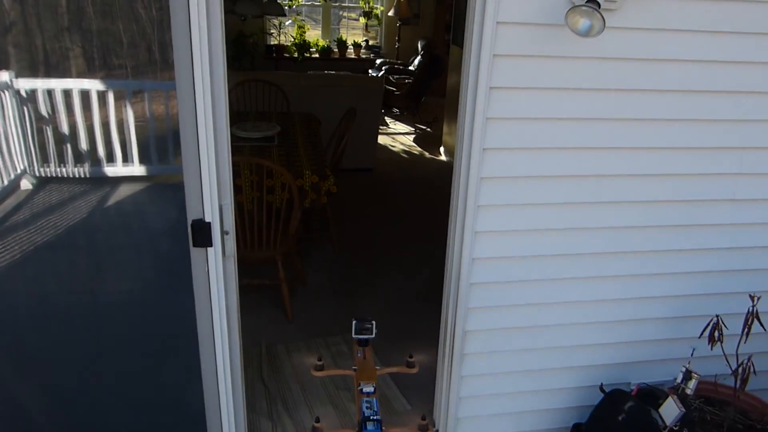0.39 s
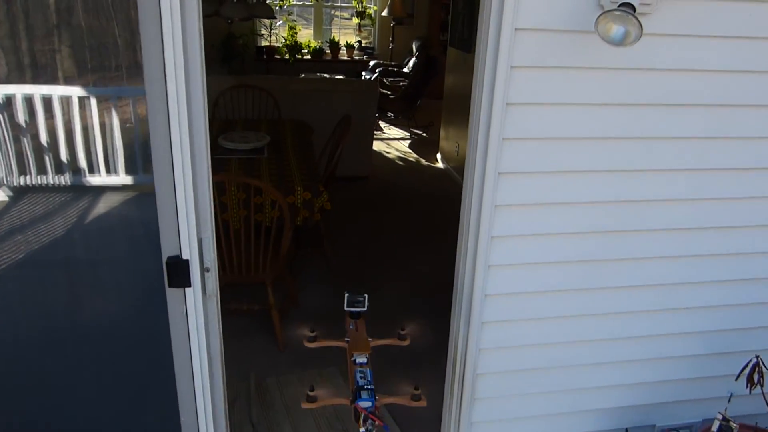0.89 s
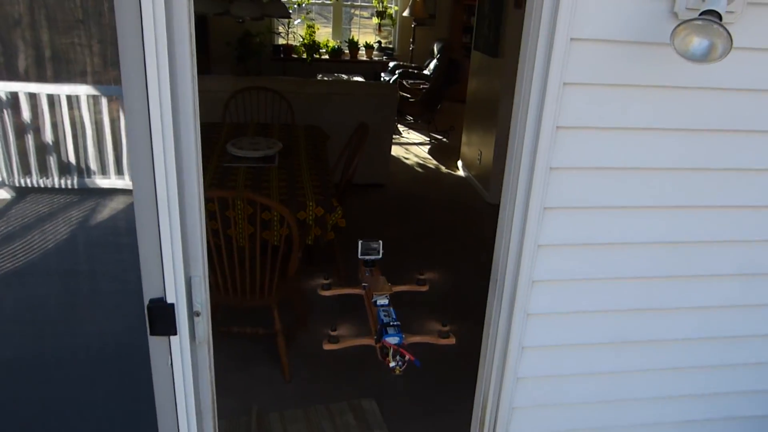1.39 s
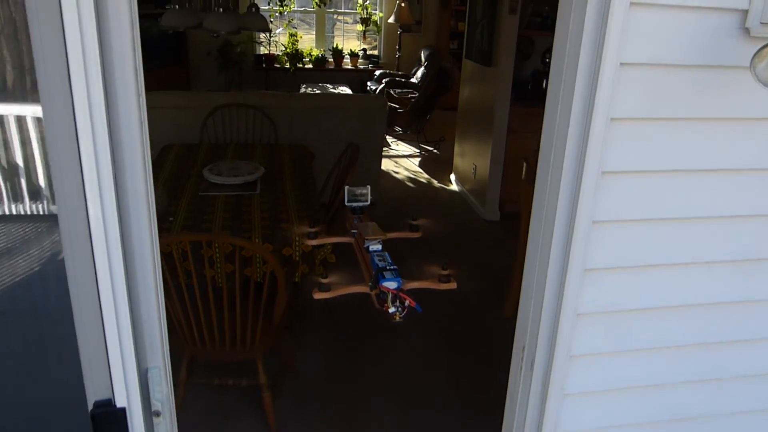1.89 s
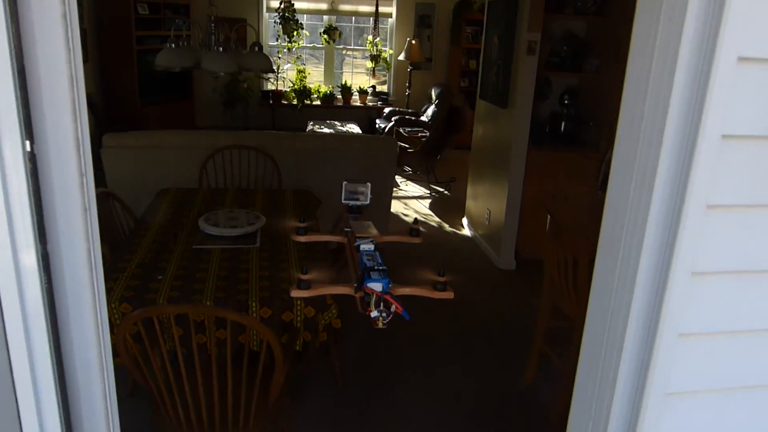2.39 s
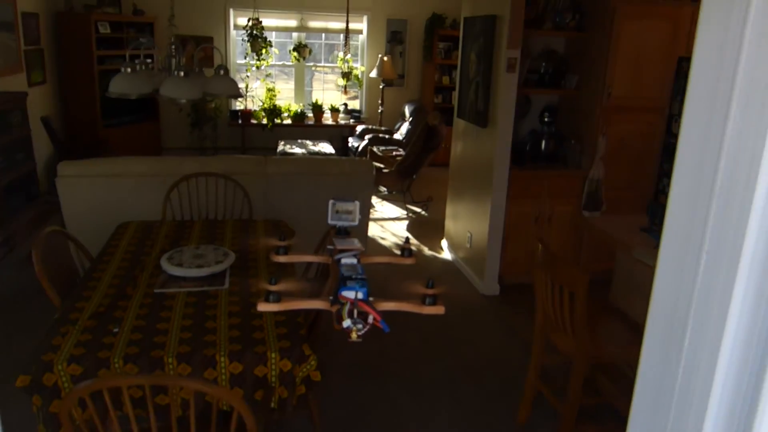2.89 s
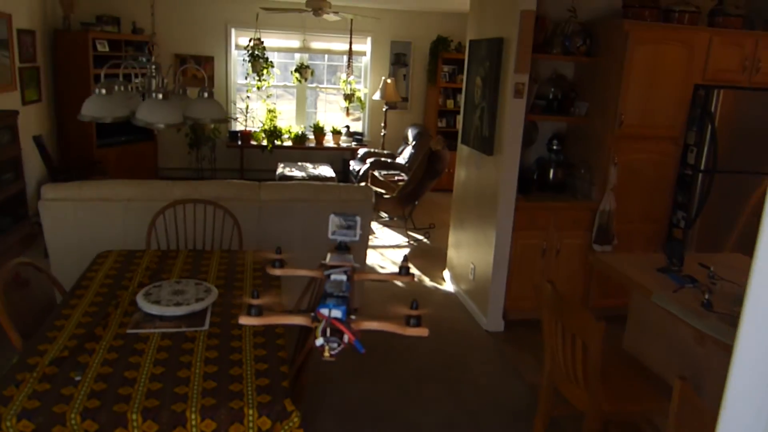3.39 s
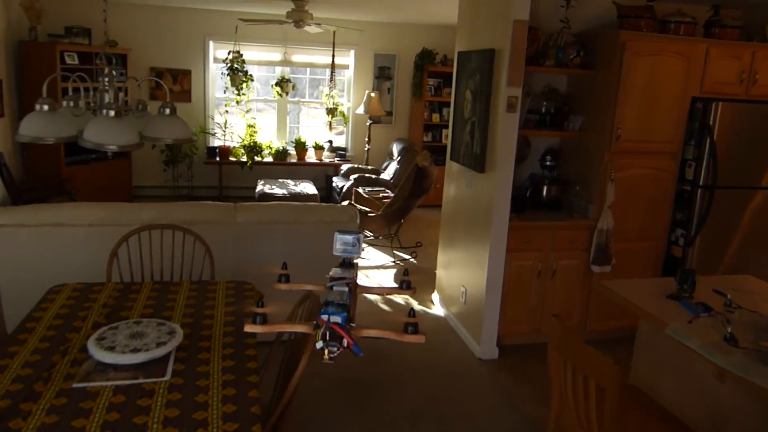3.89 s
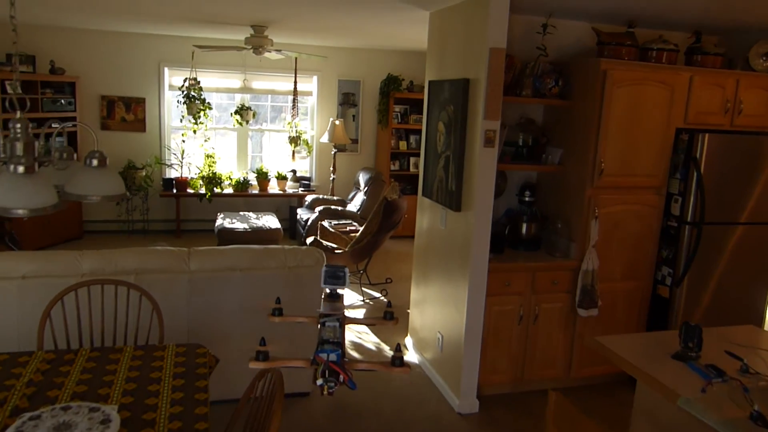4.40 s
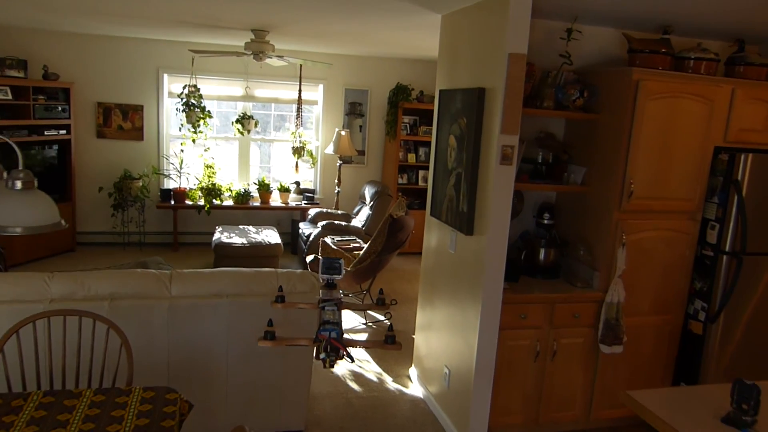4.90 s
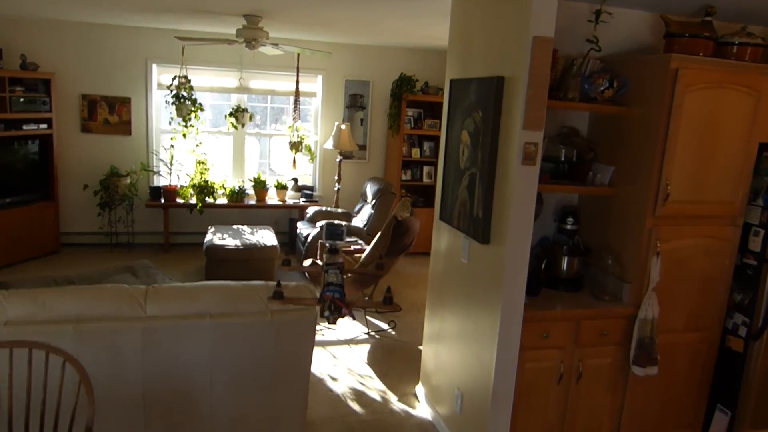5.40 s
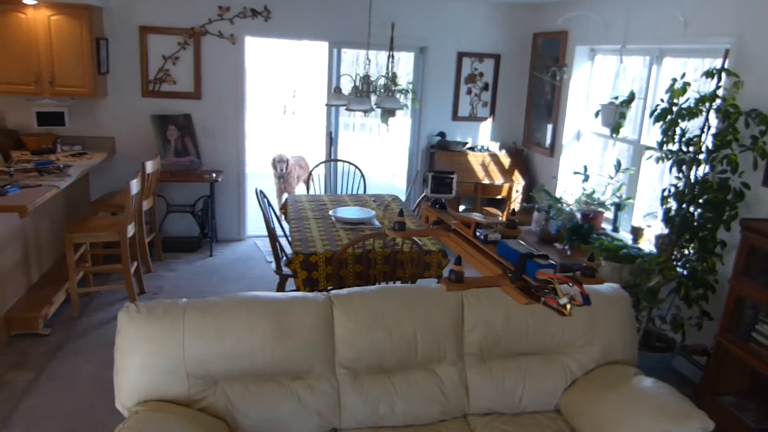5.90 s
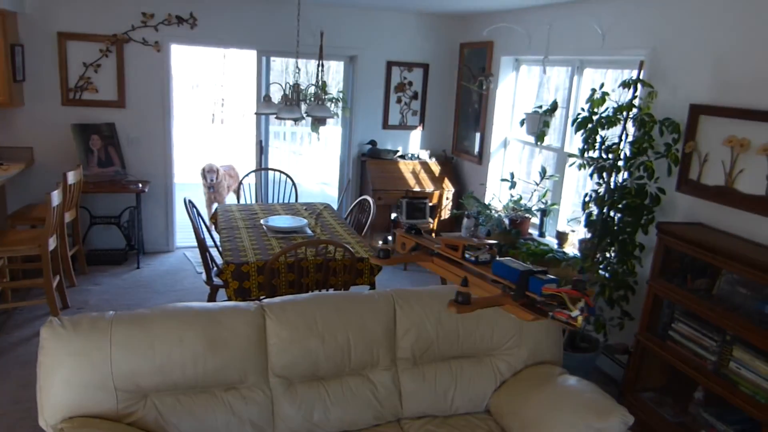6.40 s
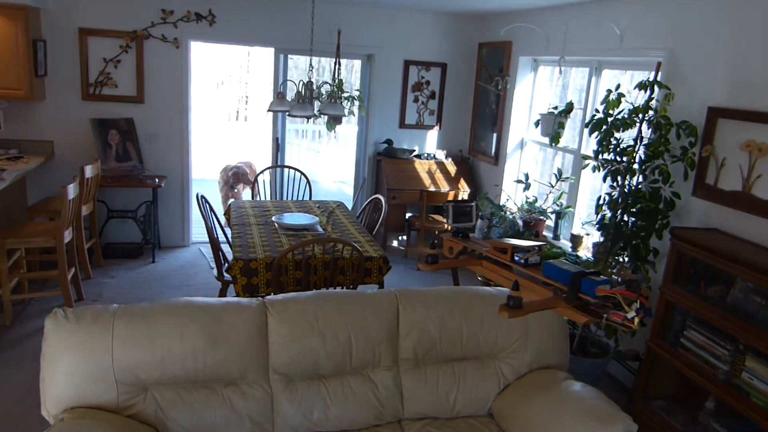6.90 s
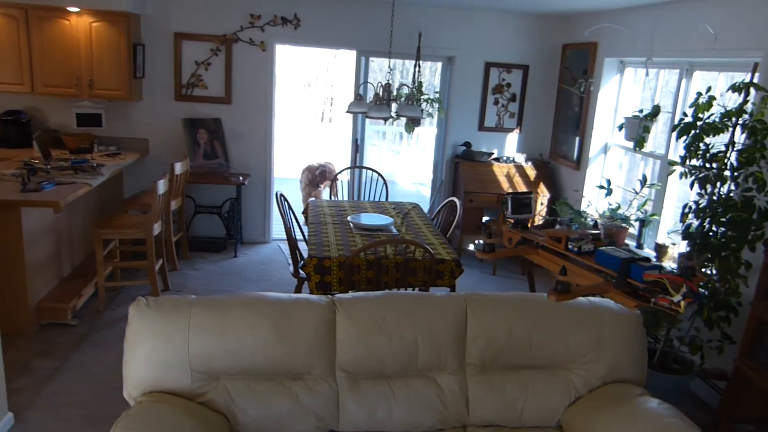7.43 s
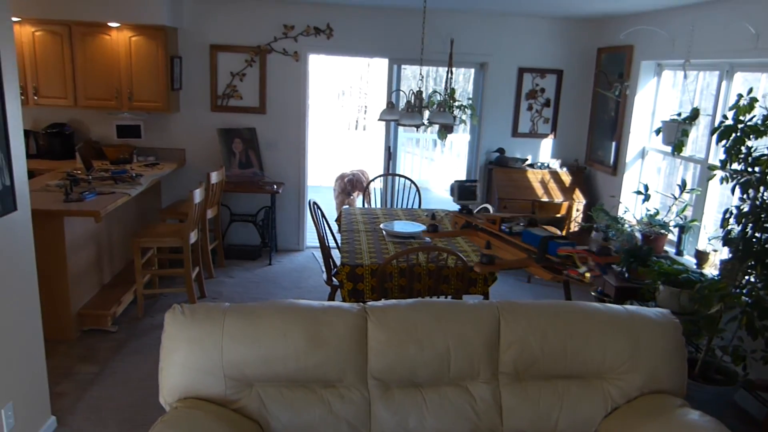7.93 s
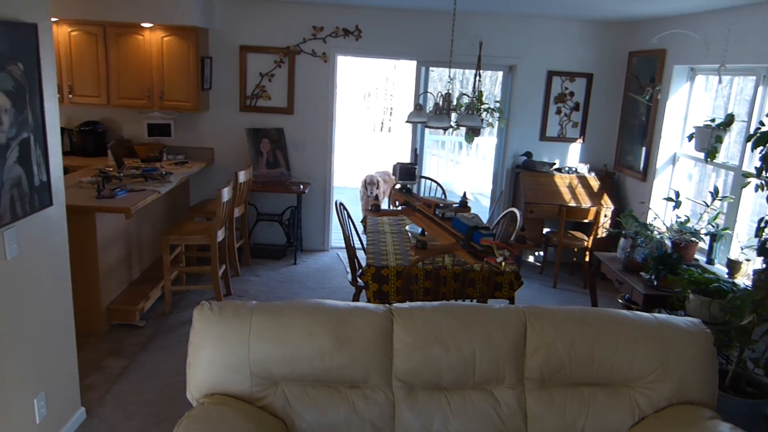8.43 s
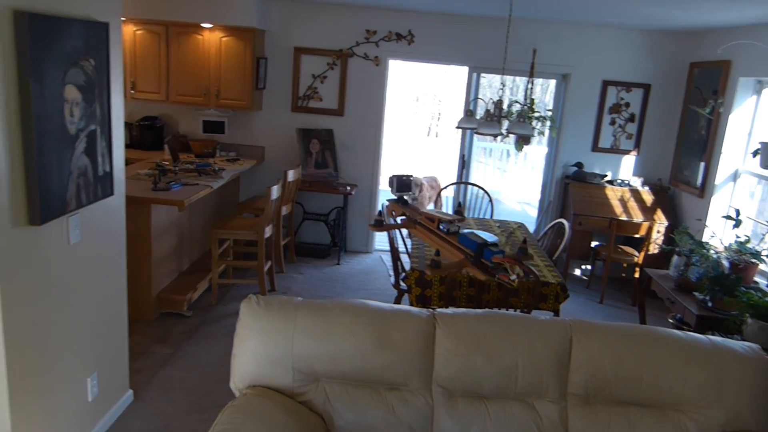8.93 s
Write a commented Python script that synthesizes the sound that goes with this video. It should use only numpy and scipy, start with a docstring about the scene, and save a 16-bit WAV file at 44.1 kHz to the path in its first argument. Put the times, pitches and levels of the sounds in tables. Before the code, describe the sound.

A small four-rotor drone buzzes steadily close by, with bright airy hiss and a thin high whine, turning a little fainter near six seconds.

```python
"""A four-rotor drone flies close by, through a doorway and around a furnished room, followed on foot.
Throughout, each two-bladed rotor hums as a stack of tones on its own wandering blade rate, four motor
drives whine and beat near 8 kHz, and the blades hiss as noise. A faint shaft-rate tone is heard in bursts
up to about 4.5 s, and the frame rings as narrow noise. Near 4 s a bright band of noise slides down as the
drone passes a surface. Near 5.9 s the viewpoint jumps further away: all drop, the low hiss weak and patchy."""
import sys
import numpy as np
from scipy import signal
from scipy.fft import rfft, irfft
from scipy.io import wavfile
from scipy.ndimage import uniform_filter1d

SR = 44100
rng = np.random.default_rng(int(sys.argv[2]) if len(sys.argv) > 2 else 0)


def convert_level_to_amplitude(level_db):
    """Map a level in decibels to its linear amplitude factor."""
    exponent = np.asarray(level_db, float) / 20
    return 10 ** exponent


def put_to_file(sound):
    """Save the sound as 16-bit audio at rate SR, in the file named by the first command-line argument."""
    columns = np.atleast_2d(sound).T  # one column per channel
    safe = np.clip(columns, -1, 1)
    whole_steps = np.round(safe * 32767)
    wavfile.write(sys.argv[1], SR, whole_steps.astype(np.int16))


N = 399105

# What the flight controller asks, as blade-pass rates:
# (t/s, thrust f/Hz, tilt of rotors 1-2 f/Hz, tilt of rotors 3-4 f/Hz, yaw f/Hz)
STICKS = [(0.0, 246.1, 9.0, 4.4, 6.4), (0.38, 245.0, 12.8, 6.2, 5.2), (0.57, 248.0, 15.8, 9.1, 4.3),
          (0.82, 247.5, 9.9, 8.2, 4.6), (1.12, 247.5, 9.2, 1.2, 4.0), (1.35, 247.0, 3.6, 0.4, 4.8),
          (1.72, 239.8, -7.7, 0.7, 11.2), (2.05, 240.5, -1.8, 0.8, 9.2), (2.3, 243.2, -0.8, -0.2, 6.5),
          (2.57, 245.4, -1.5, 2.0, 6.1), (2.72, 245.7, 5.6, 5.9, 5.6), (2.95, 242.9, 7.8, 4.4, 5.8),
          (3.2, 249.0, 10.2, 7.8, 6.2), (3.55, 243.4, 4.5, 9.2, 6.1), (3.85, 248.4, 11.5, 10.1, 6.0),
          (4.37, 247.8, 5.8, 11.2, 5.5), (4.9, 247.6, 2.6, 7.5, 7.3), (5.2, 248.1, -6.1, -3.2, 6.1),
          (5.47, 248.0, -5.3, 1.2, 5.3), (5.88, 245.2, 0.1, 6.8, 3.6), (5.9, 248.2, 8.2, 12.0, 4.9),
          (6.15, 248.5, 3.6, 10.5, 5.5), (6.47, 248.0, 7.7, 9.4, 4.7), (6.72, 248.7, 15.6, 10.6, 5.4),
          (7.1, 248.4, 19.8, 20.8, 4.7), (7.3, 248.6, 28.6, 25.5, 7.1), (7.55, 248.4, 31.0, 22.8, 9.1),
          (7.77, 247.3, 29.7, 19.4, 7.0), (8.17, 247.5, 23.5, 23.3, 2.4), (8.36, 247.5, 19.7, 22.9, 2.2),
          (8.7, 247.5, 16.7, 18.0, 4.1), (9.05, 247.2, 8.9, 10.8, 5.0)]
# Each rotor's share of the four controls, one row a rotor: (thrust, tilt 1-2, tilt 3-4, yaw)
MIXER = [(1, 1, 0, 1), (1, -1, 0, 1), (1, 0, -1, -1), (1, 0, 1, -1)]
SPEED_WANDER_HZ, SPEED_TREMBLE_HZ = .75, .6  # typical slow and fast unevenness of each blade rate

# Rotor tones; halves come from unequal blades, 21 from the motor poles:
# (multiple of blade rate, level against the hum level/dB)
ROTOR_TONES = [(1.0, -21.5), (1.5, -30), (2.0, -21.5), (2.5, -27.5), (3.0, -16.5), (3.5, -28.5),
               (4.0, -18.5), (4.5, -28), (5.0, -18), (5.5, -27), (6.0, -15.5), (6.5, -23.5), (7.0, -15.5),
               (7.5, -20.5), (8.0, -15), (9.0, -15), (10.0, -15), (11.0, -15), (12.0, -16.5), (13.0, -18),
               (14.0, -19), (15.0, -23), (16.0, -12.5), (21.0, -4)]
# Extra level of the pole tone for each motor: (level/dB)
POLE_DB = [-16, -3, -10.5, -8]
# How near each rotor sounds: (t/s, rotor 1 level/dB, rotor 2 level/dB, rotor 3 level/dB, rotor 4 level/dB)
ROTOR_NEARNESS = [(0.0, 7.5, 3, 4.5, -3), (0.9, 6.5, 6.5, 2.5, 3), (1.8, 3.5, 3.5, 5, -6),
                  (2.8, -1, 3.5, 5, -11), (3.3, 6.5, 2, 3, 3.5), (4.5, -1.5, 0, -0.5, 3),
                  (5.4, -1, 2, -2.5, 3), (5.87, -1, -5, 2, -0.5), (5.91, 7.5, 5, -2, -1),
                  (6.4, 5.5, 1.5, -8.5, -1.5), (7.2, 6.5, -2, 0, -0.5), (8, 6, 1, -3, 1.5),
                  (9.0, 8.5, 6, -2, -0.5)]
UPPER_NEARNESS = .55  # share of it left in tones above the sixth, which scatter off the walls
# One rotor tone stands out for a moment:
# (middle t/s, rotor, multiple of blade rate, rms level before wavering/dB, length/s)
SWELLS = [(0.3, 3, 8, -64.5, 1.8), (0.32, 1, 3, -65, 0.55), (0.497, 1, 4, -65, 0.46),
          (0.994, 1, 3, -66.5, 0.38), (1.7, 4, 21, -69, 0.36), (1.735, 2, 1, -72.5, 0.36),
          (1.82, 4, 3, -69.5, 0.25), (1.943, 1, 3, -67.5, 0.54), (3.21, 1, 3, -70, 1),
          (2.75, 4, 21, -63, 2), (3.147, 3, 21, -62, 0.38), (3.718, 4, 21, -61, 0.5),
          (4.034, 1, 4, -61, 0.37), (4.5, 4, 2, -74.5, 1.4), (2.304, 3, 21, -63, 0.8),
          (2.536, 1, 3, -68.5, 0.59), (5.767, 3, 4, -71.5, 0.29), (5.833, 3, 3, -66, 0.12),
          (7.543, 1, 3, -76, 0.57), (7.55, 1, 4, -77, 0.44), (7.603, 1, 2, -79, 1.5),
          (8.61, 4, 5, -69.5, 0.54), (3.997, 3, 21, -68, 0.9), (4.3, 1, 10, -69, 0.32),
          (4.5, 4, 11, -61, 0.17), (4.72, 3, 10, -64, 0.21), (4.855, 2, 10, -70, 0.48),
          (4.897, 3, 21, -63.5, 0.8), (5.348, 4, 21, -70, 0.4), (7.4, 4, 21, -66, 0.74),
          (5.344, 2, 1, -70.5, 0.48), (5.72, 3, 21, -62, 0.18), (6.198, 3, 21, -64.5, 0.58),
          (7.515, 1, 6, -71, 0.46), (7.668, 1, 5, -67.5, 0.27), (8.25, 4, 21, -65.5, 0.73),
          (8.544, 1, 8, -70.5, 0.36), (8.698, 1, 6, -74, 0.55), (8.935, 3, 21, -69, 0.25)]
HUM_DB = -62  # level that the rotor tones are set against, before the jump
HUM_FOLLOWS = 0.94  # share of the hiss's swing (in dB) that the tones follow
WAVER_HZ, WAVER_HZ_PER_ORDER = 4.9, 0.39  # higher tones come and go faster
WAVER_TOP = 1.3  # spreads of chance above which a tone grows no louder

# How each drive faces the microphone as the frame turns:
# (t/s, drive 1 level/dB, drive 2 level/dB, drive 3 level/dB, drive 4 level/dB)
DRIVE_FACING = [(0, -23, 5.5, -1, 5), (1.2, 4, 4, -5.5, -2.5), (2.1, 2, -8, 8.5, -18),
                (2.75, -5, -8, 6, 11), (3.4, -21, 8, 3.5, -4), (4, -10, 10, -7, 5),
                (4.7, -7, 8.5, -11, 4.5), (5.5, -15, 3, 8.5, 8), (6.2, -15, -6, -0.5, -1.5),
                (6.8, 4, -14, 9, -1), (7.5, -18, 10.5, -5, 7), (8.1, 4, 8.5, -3.5, -1),
                (9.05, 5, -25, 1, 3.5)]
# Pitch of each drive above the lowest one: (f/Hz)
DRIVE_OFFSETS_HZ = [0, 14.3, 43.3, 57.6]
# The gap to the microphone closes and opens, shifting the whine: (t/s, lowest drive f/Hz)
CLOSING = [(0, 8009), (.6, 8010), (1.2, 8020), (2.7, 8019), (4, 8008), (6.6, 8012), (8.2, 8005),
           (9.05, 8009)]
# Whine off the wall ahead or behind, shifted by motion: (t/s, shift f/Hz, level against direct tone/dB)
WALL = [(0, 15, -13), (3, 15, -11), (3.6, 0, -18), (4.2, -15, -8), (5.88, -15, -9), (5.9, 12, -18),
        (9.05, 12, -16)]
# Rotation modulates the whine, giving side tones:
# (distance in multiples of blade rate, motors 1-3 level against the whine/dB, motor 4 level/dB)
SIDEBANDS = [(-7, -11.5, -7), (-2, -20.5, -15), (-1, -22, -15), (-.5, -13.5, -48), (1, -23.5, -10),
             (2, -36, -12), (3, -23, -21), (7, -19, -22.5)]
WHINE_DB = -58.3  # level that the drive tones are set against, before the jump

# Hiss at the microphone before the loss at the jump, as the follower falls back and catches up:
# (t/s, level/dB)
FLIGHT = [(0, -51), (1.5, -50), (2.4, -50.5), (2.9, -53), (3.6, -51.5), (4.5, -50), (5.5, -51),
          (6.4, -50.5), (7, -49.5), (7.5, -50), (8, -53), (8.4, -50.5), (9.05, -51.5)]
# Shape of the hiss spectrum, only relative: (f/Hz, level per Hz/dB)
HISS_SPECTRUM = [(20, -17.5), (60, -58), (140, -71), (200, -35.5), (300, -38.5), (600, -26.5),
                 (1000, -23.5), (1500, -17), (3950, -7.5), (4900, -5.5), (7500, -6), (9000, -10),
                 (12000, -23.5), (15000, -41.5)]
# How alike the hiss is left and right: (f/Hz, likeness from 0 to 1)
LIKENESS = [(40, 0.75), (100, 0.46), (240, 0.48), (940, 1), (3700, 0.88), (9000, 0.86), (14600, 0.42)]
# Bass of the hiss, less away from the wall; each band takes its own share: (t/s, level/dB)
INDOORS = [(0, 5), (2.9, 4.5), (3.6, 2), (5.5, 0), (9.05, 3)]
DIP_HZ, DIP_WIDTH_HZ, DIP_DB = 4370, 170, -5  # a narrow dip in the hiss

# Two narrow rings of the frame, shaken by the motors: (f/Hz, noise pace that sets the width/Hz)
FRAME_RINGS = [(5600, 85.0), (5830, 22.0)]
# Their levels before the room: (t/s, first level/dB, second level/dB)
FRAME_DB = [(0, -89, -86), (1.5, -67, -72), (2.199, -67, -71), (2.7, -64, -63), (3.2, -60, -66),
            (4.1, -69, -61.5), (4.4, -65, -77), (5.6, -69, -66), (6.0, -84, -98), (9.05, -93, -82)]
# A bright band slides down as the drone passes a surface: (t/s, f/Hz, level before the room/dB)
SWISH = [(3.98, 7840, -88), (4.04, 7200, -54), (4.1, 4300, -61), (4.2, 3680, -62), (4.26, 3210, -83)]
SWISH_WIDTH_HZ = 42  # noise pace that sets the width

# A faint tone at the shaft rate: (t/s, rms level while it is fully heard/dB)
SHAFT_TONE = [(0, -94), (3.2, -87.5), (4.4, -89), (4.6, -115), (8.2, -115), (9.05, -98)]
BURST_HZ, BURST_RARITY = 7, .35  # pace of its bursts, and the spreads of chance to pass for one

# Balance between the ears: (t/s, left minus right level/dB)
PAN = [(0, 0.5), (1.7, 0.5), (5, 0.3), (8, -2)]
ROOM_T60_S = 0.32  # time for the echoes to fall by 60 dB
BLADES_ROOM_DB, DRIVES_ROOM_DB = -4, -7.5  # echoes against the direct sound

JUMP_S = 5.888  # the viewpoint moves further away here
JUMP_HISS_DB, JUMP_TONES_DB, FAR_POLES_DB = -4, -5, -4  # losses after it; pole tones lose their own on top
# After the jump the low hiss is weaker, with patches missing, most at first
LOW_HISS_FIRST_DB, LOW_HISS_LATER_DB, FIRST_S = -19, -5, .45  # levels, and how long the first lasts
HALVES_FIRST_DB, HALVES_LATER_DB = -14, -6  # the half multiples are weaker too


def rms_one(x):
    """Scale to unit rms."""
    return x / np.sqrt(np.mean(x ** 2) + 1e-20)


def in_time(rows):
    """Turn the columns of a table into curves, sample by sample."""
    seconds, *columns = np.transpose(rows)
    return [np.interp(np.arange(N) / SR, seconds, column) for column in columns]


def at_hz(points, hz):
    """Read a spectrum table on a log frequency axis."""
    point_hz, values = np.transpose(points)
    return np.interp(np.log(hz), np.log(point_hz), values)


def drift(rate_hz):
    """Slow random wandering of spread 1: noise smoothed twice, made at every 100th sample."""
    pole = np.exp(-200 * np.pi * rate_hz / SR)
    noise = rng.standard_normal(N // 100 + 1002)
    slow = signal.lfilter([1], [1, -2 * pole, pole * pole], noise)[1000:]  # skip the filter's start
    return np.interp(np.arange(N) / 100, np.arange(len(slow)), rms_one(slow))


def angle(hz):
    """Add up a pitch curve into a running phase in radians."""
    return 2 * np.pi * np.cumsum(hz) / SR


def after_jump():
    """Seconds since the viewpoint jumped, negative before."""
    return np.arange(N) / SR - JUMP_S


def far():
    """0 before the jump, 1 after, crossing in 12 milliseconds."""
    return np.clip(after_jump() / .012 + .5, 0, 1)


def rotor_turns():
    """Mix the controls into four blade rates, add unevenness, and return each blade-pass phase."""
    turns = []
    for blade_hz in np.array(MIXER) @ in_time(STICKS):
        wander = SPEED_WANDER_HZ * drift(11.84)
        tremble = SPEED_TREMBLE_HZ * drift(44.6)
        turns.append(angle(blade_hz + wander + tremble))
    return turns


def hum(turns, nearness_db, hum_db, waver_db, flutter_db):
    """Each blade pass gives a stack of tones; uneven inflow makes each waver and flutter, and some swell."""
    out, t = np.zeros(N), np.arange(N) / SR
    halves_db = np.interp(after_jump() / FIRST_S, [1, 2], [HALVES_FIRST_DB, HALVES_LATER_DB])
    halves = convert_level_to_amplitude(far() * halves_db)
    for rotor, (turn, rotor_db) in enumerate(zip(turns, nearness_db), 1):
        flutter = convert_level_to_amplitude(flutter_db * drift(26.0))
        for k, level_db in ROTOR_TONES:
            near_db = rotor_db * (UPPER_NEARNESS if k > 6.2 else 1)
            chance = np.minimum(drift(WAVER_HZ + WAVER_HZ_PER_ORDER * k), WAVER_TOP)
            waver = convert_level_to_amplitude(waver_db / 2 * chance)
            # The part of the wavering that swells share too, larger in high tones
            broken = waver ** (.7 if k > 7.7 else .4)
            # "broken" is multiplied back below, so a plain tone wavers by waver ** 2
            height = convert_level_to_amplitude(hum_db + near_db + level_db) * waver ** 2 / broken
            if k > 20:  # the pole tone
                height = height * convert_level_to_amplitude(POLE_DB[rotor - 1] + FAR_POLES_DB * far())
            if k % 1 > .25:  # a half multiple
                height = height * halves
            for middle, which, multiple, swell_db, length in SWELLS:
                if round(which) == rotor and abs(multiple - k) < .25:
                    swell = convert_level_to_amplitude(swell_db) * np.exp(-(2 * (t - middle) / length) ** 4)
                    height = np.hypot(height, swell)
            phase = np.round(2 * k) / 2 * turn + rng.uniform(0, 2 * np.pi)
            out += height * broken * flutter * np.sin(phase)
    return np.sqrt(2) * out  # a sine's peak is sqrt(2) times its rms


def whine(turns, whine_db, waver_db, jitter_hz):
    """Four switching tones, each with sidebands from its own rotor and a pitch-shifted wall echo."""
    lowest_hz, = in_time(CLOSING)
    shift_hz, wall_db = in_time(WALL)
    out = np.zeros(N)
    for drive, (turn, facing_db) in enumerate(zip(turns, in_time(DRIVE_FACING))):
        phase = angle(lowest_hz + DRIVE_OFFSETS_HZ[drive] + jitter_hz * drift(7.07))
        direct = convert_level_to_amplitude(2.2 * drift(4.5)) * np.sin(phase)  # fades as paths interfere
        echo_phase = phase + angle(shift_hz + 3.21 * drift(5.0))
        echo = convert_level_to_amplitude(wall_db + waver_db * drift(6.4)) * np.sin(echo_phase)
        out += convert_level_to_amplitude(facing_db) * (direct + echo)
        for k, *level_db in SIDEBANDS:
            side_db = level_db[drive // 3]  # first column for motors 1-3, second for motor 4
            side_phase = phase + np.round(2 * k) / 2 * turn
            out += convert_level_to_amplitude(side_db + waver_db * drift(8.2)) * np.sin(side_phase)
    return np.sqrt(2) * convert_level_to_amplitude(whine_db) * out


def hiss(turns, tilt_db, chop, uneven_db):
    """Turbulence off the blade tips: stereo noise in bands, the upper ones throbbing at every blade pass."""
    hz = np.maximum(np.arange(N // 2 + 1) * SR / N, 1)
    dip_db = DIP_DB * np.exp(-((hz - DIP_HZ) / DIP_WIDTH_HZ) ** 2)
    shape = convert_level_to_amplitude(at_hz(HISS_SPECTRUM, hz) + dip_db)
    mid, side = rfft(rng.standard_normal((2, N))) * shape
    alike = np.clip(at_hz(LIKENESS, hz), 0, 1)
    pair = np.sqrt(1 + alike) * mid + np.sqrt(1 - alike) * side * [[1], [-1]]

    throb = 1 + chop * sum(np.sin(turn) for turn in turns)
    low_path_db = [LOW_HISS_LATER_DB, LOW_HISS_FIRST_DB, LOW_HISS_FIRST_DB, LOW_HISS_LATER_DB]
    low_db = far() * np.interp(after_jump() / FIRST_S, [0, .4, 1, 2], low_path_db)
    out, edges = 0, [0, 180, 600, 1300, 1800, 2800, 4000, 7000, 10000, SR]
    for low, high in zip(edges, edges[1:]):
        band = irfft(pair * ((hz >= low) & (hz < high)), N)
        # Every band is a little uneven; the treble is heard to flicker, apart from the turbulence
        swing_db, swing_hz = (2 * uneven_db, 11.0) if low > 9000 else (uneven_db, 14.0)
        band = band * convert_level_to_amplitude(swing_db * drift(swing_hz))
        if 100 < low < 1000:  # weaker low hiss after the jump, its level patchy
            band = band * convert_level_to_amplitude(low_db * (1 + .55 * drift(6)))
        if low >= 2800:
            band = band * throb
        else:
            tilt_share = 1.5 if low < 1100 else .8  # the low hiss follows the tilt most
            band = band * convert_level_to_amplitude(tilt_share * tilt_db)
        out = out + band
    return rms_one(out)


def narrow(hz, width_hz, db):
    """A narrow band of noise: two slow drifts ride on a cosine and a sine whose pitch may move."""
    phase = angle(hz)
    return convert_level_to_amplitude(db) * (drift(width_hz) * np.cos(phase) + drift(width_hz) * np.sin(phase))


def frame():
    """The shaken frame rings in two narrow bands of noise."""
    out = np.zeros(N)
    for (hz, width_hz), db in zip(FRAME_RINGS, in_time(FRAME_DB)):
        out += narrow(np.full(N, hz), width_hz, db)
    return out


def swish():
    """A narrow band of noise slides down in pitch as the drone passes a surface."""
    swish_hz, swish_db = in_time(SWISH)
    return narrow(swish_hz, SWISH_WIDTH_HZ, swish_db)


def shaft(turns):
    """Once-a-turn unbalance of rotors 1 and 3 gives a faint steady tone, of which only bursts are heard."""
    db, = in_time(SHAFT_TONE)
    # Two blades pass in each turn, so the shaft runs at half the blade rate
    tone = convert_level_to_amplitude(db) * sum(np.sin(turn / 2) for turn in turns[::2])
    # The bursts come at random and are no doing of the rotors
    heard = np.clip(2 * (drift(BURST_HZ) - BURST_RARITY), 0, 1)
    return tone * uniform_filter1d(heard, size=900)


def room(x):
    """Dense echoes dying away, different on each side; they stop dead where the viewpoint jumps."""
    t = np.arange(SR // 2) / SR
    tail = rng.standard_normal((2, len(t))) * convert_level_to_amplitude(-60 * t / ROOM_T60_S)
    tail = tail * (t > .004)  # no echo in the first 4 ms
    tail = tail / np.sqrt(np.sum(tail ** 2, axis=1, keepdims=True))
    before = 1 - far()
    early = signal.fftconvolve((x * before)[None], tail, axes=1)[:, :N]
    late = signal.fftconvolve((x * far())[None], tail, axes=1)[:, :N]
    return early * before + late


def scene():
    """Tones arrive directly and through the room; hiss and shaft tone join without added echoes."""
    (hiss_db,), (tilt_db,), (pan_db,) = in_time(FLIGHT), in_time(INDOORS), in_time(PAN)
    turns = rotor_turns()
    tones_jump_db = JUMP_TONES_DB * far()

    hum_db = HUM_DB + HUM_FOLLOWS * (hiss_db - hiss_db.mean()) + tones_jump_db
    blades = hum(turns, in_time(ROTOR_NEARNESS), hum_db, waver_db=3.5, flutter_db=2.4)
    blades = blades + frame() + swish()
    blades = blades + convert_level_to_amplitude(BLADES_ROOM_DB) * room(blades)

    drives = whine(turns, WHINE_DB + tones_jump_db, waver_db=3.5, jitter_hz=2.1)
    drives = drives + convert_level_to_amplitude(DRIVES_ROOM_DB) * room(drives)

    air = hiss(turns, tilt_db, chop=0.045, uneven_db=1.0)
    air = air * convert_level_to_amplitude(hiss_db + JUMP_HISS_DB * far())

    balance = convert_level_to_amplitude(np.outer([.5, -.5], pan_db))
    return (blades + drives + air + shaft(turns)) * balance


def low_pass(x):
    """Removes everything above the highest recorded frequency."""
    return signal.sosfilt(signal.butter(12, 15220, fs=SR, output="sos"), x)


def record(dry):
    """Pass the finished mix on to be stored."""
    return low_pass(dry)


dry = scene()
out = record(dry)
put_to_file(out)
```